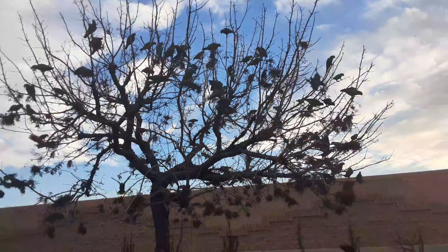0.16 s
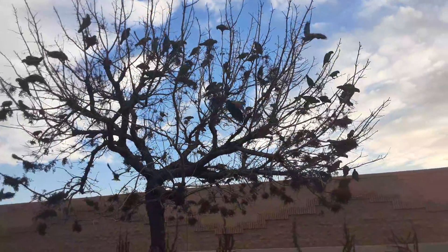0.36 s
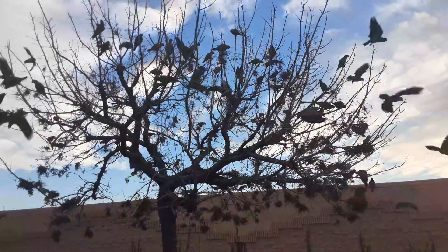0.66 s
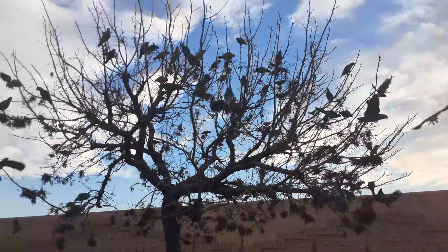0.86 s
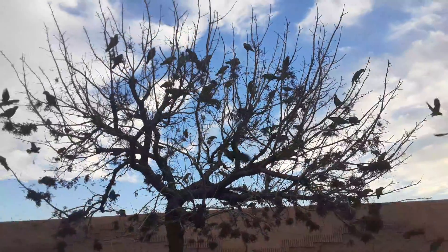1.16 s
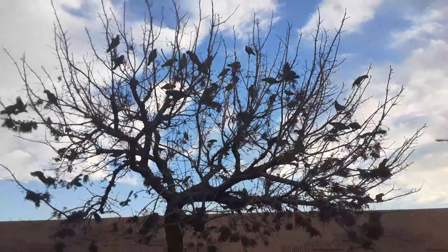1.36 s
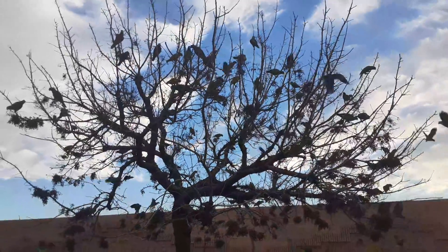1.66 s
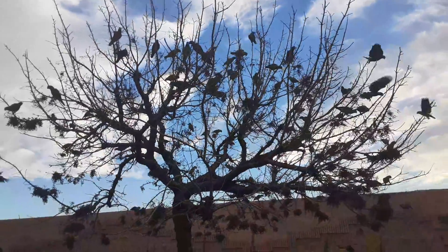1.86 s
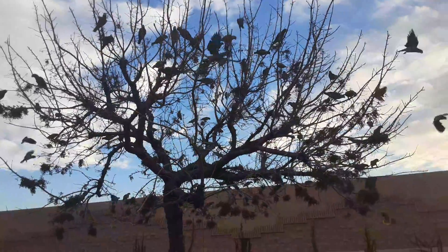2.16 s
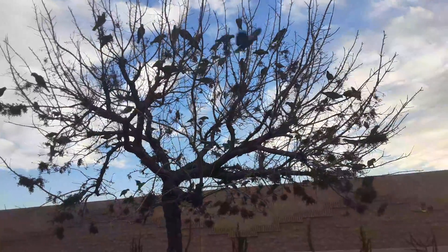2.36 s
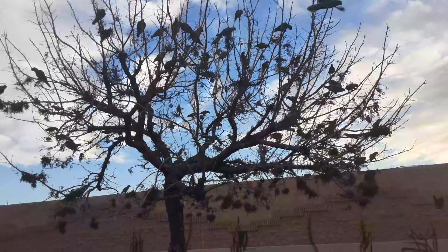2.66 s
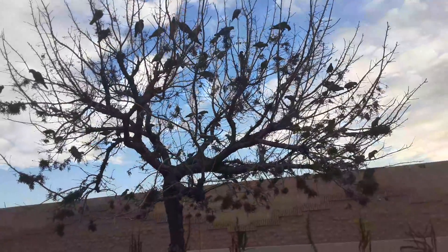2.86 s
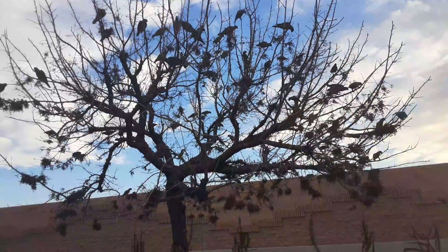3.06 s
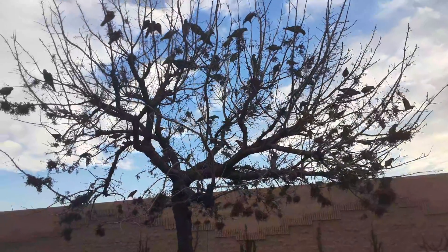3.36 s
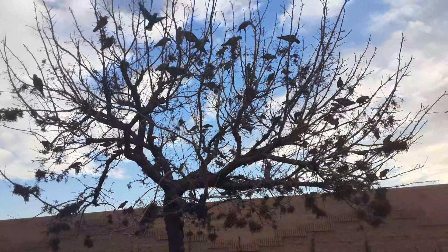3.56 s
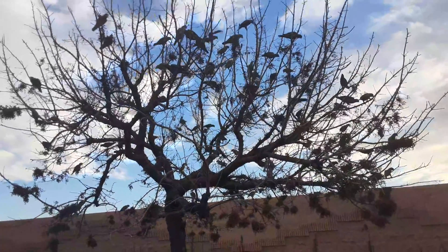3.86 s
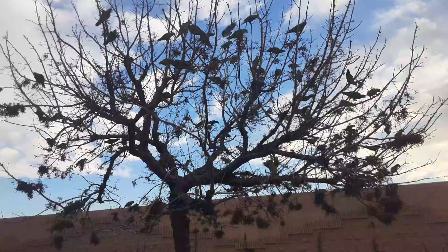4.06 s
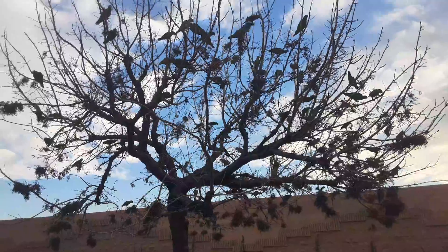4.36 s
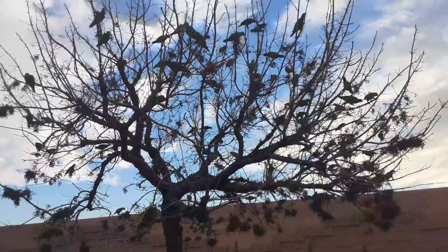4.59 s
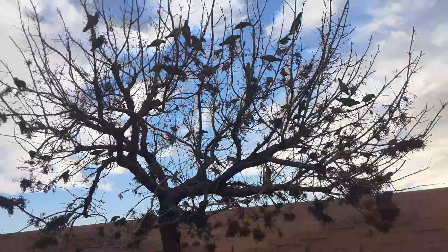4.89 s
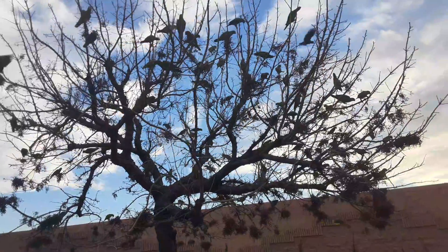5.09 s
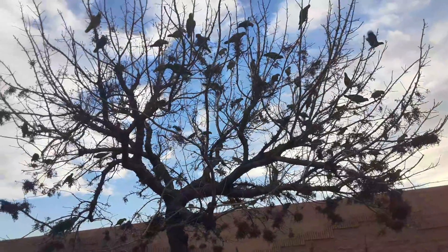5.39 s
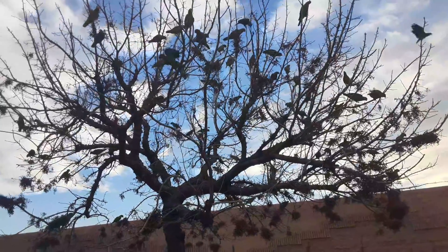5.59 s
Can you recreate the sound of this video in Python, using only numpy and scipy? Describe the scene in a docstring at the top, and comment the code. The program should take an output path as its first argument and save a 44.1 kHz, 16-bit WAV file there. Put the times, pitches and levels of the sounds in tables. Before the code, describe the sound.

Harsh overlapping parrot squawks with quick whistles and short trills, a brief lull, then renewed calls, against steady distant road noise.

```python
"""Outdoors, parrots in a bare tree beside a wall squawk at once: near pulsed voices over a chattering flock.
Traffic rumbles behind, an engine drones for a while, and fizz and dry ticks of noise come from the branches.
Whistles soon join as gliding tones, then trills as runs of quick notes; sparse echoes return from the wall.
Past four seconds a faint tone hoots far off and a small tick rings; near the end, short low waves
buffet the two-port microphone."""
import sys
import numpy as np
from scipy import signal
from scipy.fft import rfft, irfft, next_fast_len
from scipy.io import wavfile
from scipy.ndimage import uniform_filter1d

SR = 44100
rng = np.random.default_rng(int(sys.argv[2]) if len(sys.argv) > 2 else 0)


def file_out(sig):
    """Save sig as 16-bit WAV at sys.argv[1]."""
    # one column per channel
    cols = np.atleast_2d(sig).T
    # limit, then scale
    lim = np.clip(cols, -1, 1)
    pcm = np.round(lim * 32767).astype(np.int16)
    wavfile.write(sys.argv[1], SR, pcm)


N = 252693
TIME = np.arange(N) / SR
EDGE_HZ = 16200  # top of the recorded band

# what throat and beak let out: frequency_hz, relative_level_db
THROAT = [(500, -26), (1200, 4.5), (1700, 14), (2600, 12.5), (3400, 10), (4600, 8), (5900, -0.5),
          (8000, -4), (9000, -23), (12000, -15), (16000, -17)]
# tone of the fizz and ticks in the branches: frequency_hz, relative_density_db (per Hz)
FIZZ = [(3000, -42), (7000, -3.5), (9500, -20.5), (10700, -6), (11800, -1), (15500, -5.5), (16500, 6)]
# traffic, levels before each source's trim: time_s, rumble_db, tyre_roar_db
TRAFFIC = [(0.0, -31.5, -38), (0.77, -30, -36), (1.98, -33.5, -37), (3.11, -31, -38), (4.76, -31.5, -37.5),
           (4.8, -27.5, -35.5), (5.73, -28.5, -34.5)]


def gain_of(db):
    """Turns decibels into an amplitude factor."""
    return 10 ** (np.asarray(db) / 20)


def evened(x):
    """Scales to rms 1."""
    return x / np.sqrt(np.mean(x ** 2) + 1e-20)


def read(points, hz):
    """A spectrum's value at hz, on a log axis."""
    f, value = np.transpose(points)
    return np.interp(np.log(hz + 1), np.log(f + 1), value)


def curve(rows, column):
    """One column of a control table at every sample."""
    rows = np.array(rows)
    return np.interp(TIME, rows[:, 0], rows[:, column])


def add(mix, s, sound):
    """Mixes a stereo sound in at s seconds, or at the start if s is negative."""
    part = mix[:, max(round(s * SR), 0):][:, :sound.shape[1]]
    part += sound[:, :part.shape[1]]


def colour(x, db_at):
    """Filters by a rule that gives dB for each frequency."""
    n = x.shape[-1]
    size = next_fast_len(n + 256)
    gain = gain_of(db_at(np.fft.rfftfreq(size, 1 / SR)))
    return irfft(rfft(x, size) * gain, size)[..., :n]


def chance(n):
    """n normal random values of unit size."""
    return rng.standard_normal(max(n, 2 ** 14))[:n]


def wander(n, hz):
    """Random values of about unit size, 2 * hz of them a second, joined by straight lines."""
    at = np.arange(n) * 2 * hz / SR
    return np.interp(at, np.arange(n + 2), chance(n + 2))


def ports(x, pan_db, lag_s):
    """One sound at both ports: the left is pan_db louder and hears it lag_s later."""
    offset = np.array([[-.5], [.5]]) * round(lag_s * SR / 2) * 2
    at = np.arange(len(x)) + offset
    pair = np.array([np.interp(a, np.arange(len(x)), x, 0, 0) for a in at])
    return pair * gain_of([[pan_db / 2], [-pan_db / 2]])


def noise_pair(spectrum, likeness, lag_s):
    """Coloured noise from one direction, partly alike at the two ports."""
    shared = ports(rng.standard_normal(N), 0, lag_s)
    likeness = np.clip(likeness, 0, 1)
    pair = np.sqrt(likeness) * shared + np.sqrt(1 - likeness) * rng.standard_normal((2, N))
    return evened(colour(pair, lambda f: read(spectrum, f)))


def syllable(n, rise_s, fall_s):
    """The air pressure of one call, rising and falling along quarter sines."""
    t = np.arange(n) / SR
    rise = np.sin(np.pi / 2 * np.minimum(t / rise_s, 1))
    return rise * np.sin(np.pi / 2 * np.minimum(t[::-1] / fall_s, 1))


def squawk(length, pulse_hz, rough, peak_hz, lift_db, peak_db=7, width_hz=350, rattle_hz=110, rattle=0.13,
           breath=0.98):
    """The syrinx slaps in uneven pulses, rattling as it does; the throat rings with each."""
    n = int((length + .014) * SR)
    arch = .96 + .07 * np.sin(np.linspace(0, np.pi, n))
    # the pitch lurches, so that scraps of harmonics flash up and vanish
    lurch = .13 * wander(n, 70) + .07 * wander(n, 400)
    turns = np.cumsum(pulse_hz * arch * np.exp(rough * lurch)) / SR
    slaps = np.diff(np.floor(turns), prepend=0) * np.exp(.35 * rough * chance(n))
    puffs = np.exp(-(turns % 1) / 0.11) * chance(n)  # breath noise fading after each slap
    drive = evened(slaps - slaps.mean()) + breath * rough * evened(puffs)
    beats = np.cumsum(rattle_hz * np.exp(0.5 * wander(n, 63.4))) / SR
    strain = .45 * wander(n, 45)
    drive = drive * np.exp(rough * (rattle * np.sin(2 * np.pi * beats) + strain))

    def throat_db(f):
        resonance = peak_db / (1 + ((f - peak_hz) / width_hz) ** 2)
        return read(THROAT, f) + resonance + lift_db * np.clip((f - 2800) / 1500, 0, 1)

    voice = colour(drive, throat_db)
    scatter = chance(96) * np.exp(-np.arange(96) / 25) * .2
    voice = voice + signal.convolve(voice, scatter)[:n]  # branches smear each pulse
    return evened(voice * syllable(n, 0.0023, 0.011))


def squawk_notes(squawk_db=-.5):
    """Squawks share one swell; short ones are clearer, long ones rasp."""
    # near squawks, length before the call's 0.014 s of extra tail, level before swell and trim:
    # start_s, length_s, nominal_pulse_rate_hz, main_resonance_hz, treble_lift_db, level_db
    squawks = [(0, 0.21, 650, 2800, 1.5, -23.5), (.265, 0.053, 802, 2700, -1, -25.5),
               (.347, 0.094, 884, 2960, 2, -26), (.488, 0.018, 852, 3000, 2, -24),
               (0.589, 0.02, 842, 1640, 10.5, -27), (0.653, 0.048, 739, 2700, 0, -22.5),
               (0.734, 0.15, 693, 3730, 2.5, -24.5), (0.863, 0.061, 801, 2600, -2, -23.5),
               (1.014, .15, 774, 3200, 9, -19), (1.135, 0.083, 776, 3180, 4, -24),
               (1.313, 0.031, 688, 2170, 2, -17.5), (1.363, .031, 786, 2010, 11, -20.5),
               (1.417, 0.028, 802, 2480, 5, -22), (1.476, .024, 788, 1920, 4, -23),
               (1.63, .12, 700, 2840, -5, -27), (2.04, 0.035, 688, 3470, 4, -23.5),
               (2.152, 0.052, 657, 2800, -3.5, -19), (2.255, 0.029, 701, 2880, 0.5, -25.5),
               (2.291, 0.023, 828, 4000, 6, -27.5), (2.315, 0.027, 595, 1720, 0.5, -22.5),
               (2.617, .088, 645.6, 2580, 4, -19.5), (2.791, .12, 683, 3700, -5.5, -22),
               (2.908, 0.083, 739, 2650, 9, -18), (3.157, .026, 666, 3000, 6.5, -18),
               (3.21, .037, 840, 1690, 7, -20.5), (3.25, .07, 790, 2630, -1, -28),
               (3.345, 0.082, 801, 2280, 0.5, -19.5), (3.689, .2, 755, 1670, 2.5, -28),
               (4.02, 0.31, 782, 1640, 0, -34.5), (4.67, 0.052, 694, 2060, 10.5, -29),
               (4.736, 0.068, 820, 1710, 12, -25.5), (5.259, 0.03, 1202, 4630, -6, -21.5),
               (5.381, 0.085, 656.4, 1680, 2, -22), (5.529, 0.023, 625, 2260, -6, -22.5),
               (5.629, 0.014, 772, 4200, 6, -16), (5.659, 0.023, 656, 3130, 5, -16.5),
               (5.705, 0.039, 658, 4000, 8, -23)]
    rough_short, rough_long, rough_after_s = .3, .7, .035
    swell_db, swell_top = 4, .45  # depth, and the top's share of the length
    for s, length, pulse_hz, peak_hz, lift_db, db in squawks:
        rough = rough_long + (rough_short - rough_long) * np.exp(-length / rough_after_s)
        call = squawk(length, pulse_hz, rough, peak_hz, lift_db)
        off_top = 2 * (np.linspace(0, 1, len(call)) - swell_top)
        yield s, call * gain_of(db + squawk_db - swell_db * off_top ** 2)


def far_birds(count=160, chatter_db=-2.5, shrill_db=-1):
    """Many overlapping calls and their echo, swelling and thinning with the flock's excitement."""
    # the rest of the flock, levels before trim: time_s, chatter_db, shrill_part_db
    flock = [(0, -29, -30), (.12, -24.5, -30), (.28, -36, -36.5), (.8, -29, -32), (.98, -27, -36),
             (1.16, -23.5, -33), (1.29, -25, -32), (1.45, -27, -27), (1.62, -19.5, -29.5),
             (1.86, -30, -44.5), (1.99, -39.5, -45), (2.16, -27, -32.5), (2.42, -47, -47), (2.56, -35, -41),
             (2.76, -35, -33.5), (2.95, -19, -27.5), (3.3, -28, -26), (3.56, -30.5, -45),
             (3.82, -27.5, -32), (3.95, -34, -44.5), (4.24, -35.5, -41), (4.38, -45, -55.5),
             (4.63, -39, -54), (4.77, -29, -38), (4.93, -31.5, -42), (5.27, -26, -37), (5.73, -31, -35.5)]
    out = np.zeros((2, N))
    for k, (when, kind, size, pitch, glide, side) in enumerate(rng.random((count, 6))):
        length, hz = .018 + .04 * size, 2000 + 1200 * pitch
        if kind < .2:  # about one call in five whistles
            call = whistle(length, hz * (.9 + .15 * glide), hz, hz * (1 - .1 * glide), .3, 3)
        else:
            call = squawk(length, 600 + 350 * glide, .3 + .4 * size, hz, 0)
        start_s = (k + when) / count * N / SR - .04
        add(out, start_s, ports(call, 8 * side - 5.5, .0009 * (.5 - side)))
    out = out + .7 * yard(out)
    # split near 3600 Hz, so that chatter and shrill part each keep their own level
    low = colour(out, lambda f: -10 * np.log10(1 + (f / 3600) ** 10))
    chatter_level = curve(flock, column=1) + chatter_db
    shrill_level = curve(flock, column=2) + shrill_db
    mix = np.zeros((2, N))
    for band, db in ((low, chatter_level), (out - low, shrill_level)):
        power = uniform_filter1d((band ** 2).mean(0), size=4000)
        mix += band / np.sqrt(power + 0.084 * power.mean()) * gain_of(db)
    return mix


def yard(x, first_s=0.01):
    """Sparse echoes from wall and ground, the treble dying first."""
    # time for the echo to fall by 60 dB: frequency_hz, decay_s
    echo_t60 = [(500, 1), (2500, 0.39), (5000, 0.33), (12000, 0.18)]
    taps = rng.choice([-1., 1.], (2, SR // 2)) * (rng.random((2, SR // 2)) < 2000 / SR)
    taps = taps * (np.arange(SR // 2) > first_s * SR)
    hz, t, z = signal.stft(taps, SR, nperseg=256)
    decay = gain_of(-60 * t / read(echo_t60, hz)[:, None])
    tail = signal.istft(z * decay, SR, nperseg=256)[1]
    return signal.fftconvolve(x, tail / np.linalg.norm(tail[0]), axes=1)[:, :N]


def road_rumble(rumble_db=0):
    """Distant traffic's low noise, nearly alike at both ports and a little stronger at the left."""
    # tone of the rumble: frequency_hz, relative_density_db (per Hz)
    rumble_tone = [(20, -20), (40, -22), (62, 0), (85, 1.5), (120, 1.5), (160, -2.5), (220, -4), (320, -13),
                   (500, -17), (1500, -98)]
    level = gain_of(curve(TRAFFIC, column=1) + rumble_db)
    return noise_pair(rumble_tone, 0.96, 0) * level * gain_of([[.7], [-.7]])


def tyre_roar(roar_db=8.0):
    """Broad tyre noise that reaches the right port first."""
    # tone of the roar: frequency_hz, relative_density_db (per Hz)
    roar_tone = [(150, -22), (300, -0.5), (480, 0.5), (730, 9), (1000, 7), (1400, 4.5), (2200, -4.5),
                 (3500, -18), (6000, -26), (12000, -46)]
    level = gain_of(curve(TRAFFIC, column=2) + roar_db)
    return noise_pair(roar_tone, 0.67, 0.00043) * level * gain_of([[-.4], [.4]])


def engine_drone():
    """One engine's low sine, wavering in pitch and level."""
    # the drone before its waver: time_s, pitch_hz, level_db
    drone = [(2.85, 113, -38), (3.1, 108.3, -28), (3.42, 113.4, -34.5), (3.58, 111.3, -31.5),
             (3.95, 111, -28.5), (4.15, 108, -37)]
    turns = np.cumsum(curve(drone, column=1) * (1 + 0.0045 * wander(N, 16))) / SR
    return np.sin(2 * np.pi * turns) * gain_of(curve(drone, column=2) + 2 * wander(N, 7.2))


def crown_fizz(fizz_db=9.5, crackle=0.32):
    """A crackly treble noise from the bustle in the crown."""
    # the fizz before trim: time_s, level_db
    fizz_level = [(0.0, -49.5), (1.55, -44), (1.82, -53), (2.06, -45), (2.2, -45.5), (2.49, -50),
                  (3.06, -61), (3.3, -59), (3.43, -55.5), (4.55, -61), (4.82, -52.5), (5.73, -49)]
    bustle = gain_of(curve(fizz_level, column=1) + fizz_db)
    return noise_pair(FIZZ, 0.022, 0) * bustle * evened(np.exp(crackle * wander(N, 300)))


def dry_ticks(tick_db=5.5, decay_s=0.012, count=12, small_db=-41):
    """Branches snap in short, unevenly dying noise bursts; the fainter ones fall at random."""
    # the loudest ticks, before trim: start_s, level_db
    ticks = [(.0867, -31), (.905, -25), (.9627, -37), (1.3339, -30), (1.7185, -30.5), (2.152, -23),
             (2.2633, -31), (2.4334, -34), (3.8686, -39), (4.0572, -39), (5.0774, -39), (5.2634, -36),
             (5.564, -37), (5.669, -26.5)]
    out = np.zeros((2, N))
    t = np.arange(1200) / SR
    small = [(when * N / SR, small_db) for when in rng.random(count)]
    for s, db in (*ticks, *small):
        snap = evened(colour(rng.standard_normal((2, len(t))), lambda f: read(FIZZ, f)))
        decay = np.exp(-t / decay_s + .4 * wander(len(t), 900))
        add(out, s, gain_of(db + tick_db) * snap * decay)
    return out


def whistle(length, start_hz, middle_hz, end_hz, rough, lift_db, jitter=0.15, rattle_hz=112, overtone_db=-7):
    """A near-pure note on a pitch arch; when rough, a rattle chops it and shakes its pitch."""
    n = int((length + 0.00634) * SR)
    bend = np.polyfit([0, .5, 1], [start_hz, middle_hz, end_hz], 2)
    arch = np.polyval(bend, np.linspace(0, 1, n))
    rattle = np.sin(2 * np.pi * np.cumsum(rattle_hz * np.exp(0.32 * wander(n, 67.3))) / SR)
    quaver = .01 * wander(n, 110) + .07 * rough * rattle
    hz = arch * (1 + quaver + jitter * rough * wander(n, 689))
    turns = np.cumsum(hz) / SR
    tone = np.zeros(n)
    for k in range(1, 6):
        db = read(THROAT, k * arch) + overtone_db * np.log2(k) + (k > 1) * lift_db
        tone += gain_of(db) * (k * arch < EDGE_HZ) * np.sin(2 * np.pi * k * turns)
    flutter = .25 * wander(n, 80) + rough * (.8 * rattle + wander(n, 600))
    return evened(tone * np.exp(flutter) * syllable(n, 0.0098, 0.0017))


def whistle_notes():
    """Single glides and screeches that move fast while high and linger while low."""
    # near whistles, length before the note's 0.006 s of extra tail:
    # start_s, length_s, start_hz, end_hz, roughness (0-1), overtone_lift_db, level_db
    whistles = [(.318, 0.061, 3150, 3100, 0.17, 6, -31), (0.416, 0.022, 2590, 2626, .1, 5, -19.5),
                (0.519, .08, 2046, 2420, 0.35, -6, -24.5), (0.912, 0.011, 2790, 2780, 0.2, 36, -27),
                (1.174, 0.068, 2290, 2416, 0.25, 2, -24), (1.51, 0.032, 2740, 2714, 0.06, -9, -19.5),
                (1.683, 0.02, 3070, 2970, 0.25, -1, -23.5), (1.707, 0.035, 2650, 2390, 0.1, -12, -25.5),
                (2.106, 0.015, 1600, 1750, 0.1, 20, -21.5), (2.492, 0.11, 2670, 2770, 0.19, 1.5, -31),
                (2.575, 0.034, 2360, 1950, 0.16, 3, -18), (2.584, 0.09, 4550, 2457, 0.43, 7.5, -18.5),
                (2.716, 0.11, 1332, 1444, 0.19, 17, -30), (2.895, 0.092, 2220, 2270, 0.36, 9.5, -24),
                (3.054, 0.052, 1546, 1490, 0.43, 12, -23), (3.122, 0.02, 1587, 1570, 0, 20, -20.5),
                (3.187, 0.053, 2430, 2580, 0.02, -16, -20.5), (3.287, 0.062, 2600, 2550, 0.1, -5, -28),
                (4.169, 0.091, 2800, 2940, 0.1, 2, -39), (4.718, 0.079, 2258, 2490, 0.29, 5, -28),
                (4.801, 0.071, 2150, 1866, 0.44, 14, -31.5), (5.029, 0.076, 2097, 2455, .2, 7.5, -28),
                (5.135, 0.055, 2200, 2116, 0.36, 7, -31), (5.191, 0.093, 2000, 2434, .27, 8, -25.5),
                (5.484, 0.061, 1743, 1970, 0.42, 15, -26.5)]
    glide_bend = .22  # halfway in time, the pitch lies this share of the way from low end to high end
    for s, length, start_hz, end_hz, rough, lift_db, db in whistles:
        middle_hz = min(start_hz, end_hz) + glide_bend * abs(end_hz - start_hz)
        yield s, gain_of(db) * whistle(length, start_hz, middle_hz, end_hz, rough, lift_db)


def trill_notes():
    """Evenly spaced arched notes; pitch and level slide from the first to the last."""
    # runs of quick notes, length before the note's 0.006 s of extra tail: start_s, notes (count),
    # spacing_s, length_s, first_hz, last_hz, first_db, last_db
    trills = [(1.343, 3, 0.062, 0.0266, 2795, 2690, -18, -24),
              (1.522, 3, .042, 0.022, 2180, 1850, -20, -24),
              (1.752, 9, 0.016, .011, 2190, 1823, -18.5, -23),
              (2.069, 4, .057, 0.013, 2847, 2600, -21.5, -23.5),
              (5.625, 3, 0.037, 0.016, 2590, 2650, -18, -25)]
    scoop, drop = .02, 0.071  # each note starts and ends this share under its middle pitch
    rough, lift_db = 0.17, -5
    for s, notes, spacing, length, first_hz, last_hz, first_db, last_db in trills:
        for k, along in enumerate(np.linspace(0, 1, round(notes))):
            hz = first_hz * (last_hz / first_hz) ** along
            note = whistle(length, hz * (1 - scoop), hz, hz * (1 - drop), rough, lift_db)
            yield s + k * spacing, note * gain_of(first_db + along * (last_db - first_db))


def near_birds(spread_s=.0004, pan_db=-3.0):
    """Every call comes from its own place in the crown, mostly toward the right port."""
    out = np.zeros((2, N))
    for s, call in (*trill_notes(), *whistle_notes(), *squawk_notes()):
        side, lag = rng.uniform(-1, 1, 2)
        add(out, s, ports(call, pan_db + 2 * side, spread_s * lag))
    return out


def hoot(waver=0.023):
    """A soft, slightly wavering sine from far away."""
    start_s, length_s, pitch_hz, level_db = 4.28, 0.2, 650, -39
    n = int(length_s * SR)
    turns = np.cumsum(pitch_hz * (1 + waver * wander(n, 25))) / SR
    tone = np.sin(2 * np.pi * turns) * syllable(n, .02, 0.046)
    out = np.zeros((2, N))
    add(out, start_s, ports(gain_of(level_db) * evened(tone), 0, 0))
    return out


def ringing_tick():
    """One small tick that rings as a fast-dying sine."""
    # the tick: start_s, pitch_hz, level_db, decay_s
    tink = [(4.497, 6740, -26.5, 0.0015)]
    out = np.zeros((2, N))
    t = np.arange(1200) / SR
    for s, hz, db, ring_s in tink:
        add(out, s, ports(gain_of(db) * np.sin(2 * np.pi * hz * t) * np.exp(-t / ring_s), 0, 0))
    return out


def buffets():
    """Short low pushes of air on the microphone: a few cycles or fewer in a smooth swell."""
    # the pushes: start_s, length_s, pitch_hz, level_db
    pushes = [(5.31, 0.02, 141, -18), (5.385, 0.011, 204, -13.5), (5.589, 0.021, 137, -15.5)]
    out = np.zeros((2, N))
    for s, length, hz, db in pushes:
        t = np.arange(int(length * SR)) / SR
        push = gain_of(db) * np.hanning(len(t)) * np.sin(2 * np.pi * hz * t)
        add(out, s, ports(push, 0.74, 0))
    return out


def scene(echo_db=-9):
    """The flock and its echo over the traffic, with branches, hoot and buffets."""
    birds = near_birds()
    flock = birds + gain_of(echo_db) * yard(birds) + far_birds()
    branches = crown_fizz() + dry_ticks() + ringing_tick()
    traffic = road_rumble() + tyre_roar() + engine_drone()
    return flock + branches + traffic + hoot() + buffets()


def record(dry):
    """The two ports colour the treble differently; then the band limit."""
    # the left port rings in the treble where the right one dips: frequency_hz, left_minus_right_db
    port_colour = [(3000, 0.5), (5500, -1.5), (7200, 1.5), (8300, 7), (9500, 20), (10500, 3), (11500, 1),
                   (14000, 1)]
    heard = colour(dry, lambda f: read(port_colour, f) * np.array([[.5], [-.5]]))
    band_limit = signal.firwin(511, EDGE_HZ, window=("kaiser", 9), fs=SR)
    return signal.oaconvolve(heard, band_limit[None], "same")


dry = scene()
out = record(dry)
file_out(out)
```